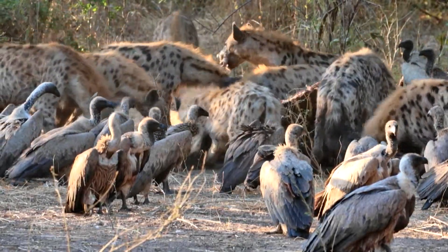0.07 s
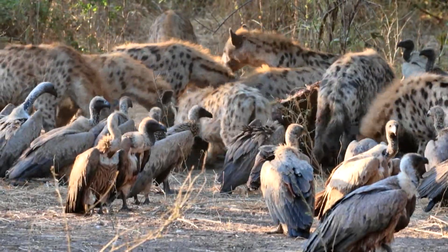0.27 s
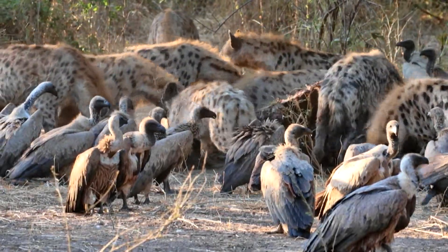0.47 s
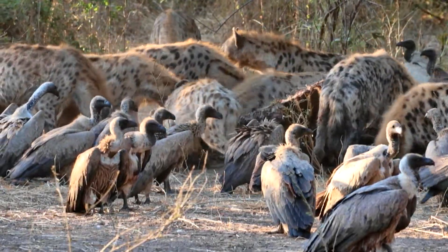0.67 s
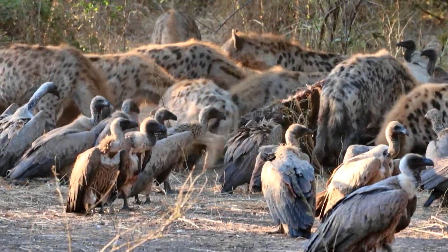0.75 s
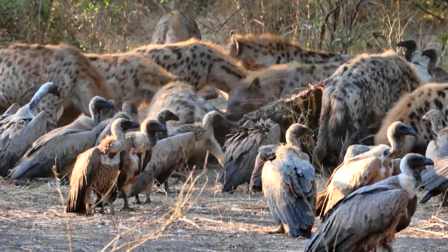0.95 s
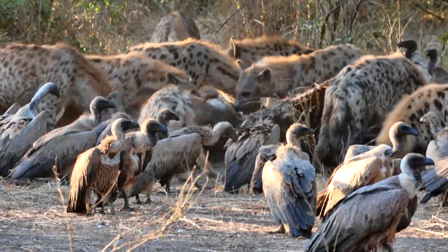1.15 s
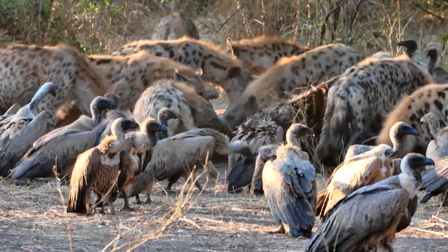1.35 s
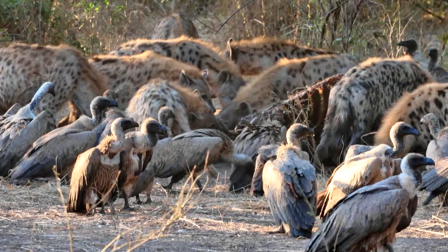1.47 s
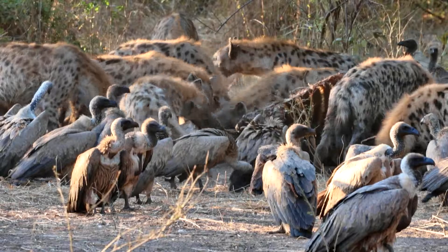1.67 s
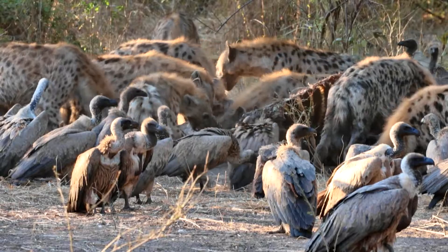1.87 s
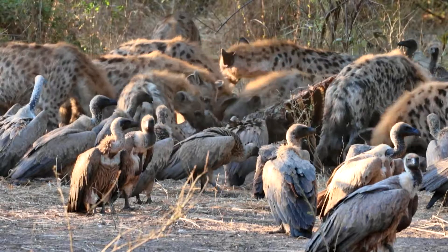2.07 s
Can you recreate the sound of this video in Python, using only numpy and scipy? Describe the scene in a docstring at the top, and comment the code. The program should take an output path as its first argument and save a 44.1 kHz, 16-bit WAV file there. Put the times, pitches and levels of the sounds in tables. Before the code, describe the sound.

A hyena's long whooping whine climbs hoarsely, cracks into a clear squeal, then sinks away outdoors

```python
"""Insects sing over still air and dry grass rustles; then, in open bush, hyenas squabble over a carcass.
One long call climbs as a hoarse moan with half-pitch lines, breaks up to a clear squeal and sinks again.
The scrub echoes it, a growl lies beneath, a small bird chirps twice, something among the vultures hisses.
Voice, bird and insects are sine waves with moving pitch; growl, hiss, grass and air are coloured noise."""
import sys
import numpy as np
from scipy import signal
from scipy.fft import rfft, irfft
from scipy.io import wavfile
from scipy.ndimage import uniform_filter1d

SR = 44100
rng = np.random.default_rng(int(sys.argv[2]) if len(sys.argv) > 2 else 0)


def bounce(signal):
    """Save signal as a 16-bit WAV file at the path given by the first command-line argument."""
    frames = np.transpose(np.atleast_2d(signal))
    limited = np.clip(frames, -1, 1)
    pcm = np.round(limited * 32767).astype(np.int16)
    wavfile.write(sys.argv[1], SR, pcm)


N = 92610
T = np.arange(N) / SR  # time of each sample, s

# colour of the still air: (f/Hz, level/dB)
AIR_COLOUR = [(22, -12), (42, 6.5), (1200, 8), (2200, -1), (5000, -4), (8500, -6.5), (16000, -17)]
AIR_DB = -54

# insect whines: (f/Hz, level/dB, slow wander/Hz)
INSECT_WHINES = [(9063, -60.5, 52), (7220, -69, 20)]
INSECT_WANDER_PER_S, INSECT_TREMOR_HZ, INSECT_FLUTTER_DB = 5, 45.5, 2

# strength of the low growl beneath the call: (t/s, level/dB)
GROWL_STRENGTH = [(0, -71), (.6, -67.5), (.8, -60.5), (1.12, -55.5), (1.3, -61.5), (1.8, -68.5)]
# colour of the growl: (f/Hz, level/dB)
GROWL_COLOUR = [(45, -28.5), (80, -2.5), (105, 2.5), (150, 0.5), (300, -28.5)]

# rustles in dry grass: (t/s, decay/s, centre f/Hz, level/dB)
GRASS_RUSTLES = [(0.032, 0.071, 4430, -56.5), (1.044, 0.03, 2620, -55.5), (1.051, 0.019, 6020, -53.5),
                 (1.229, 0.0081, 2850, -54), (1.6, 0.037, 4900, -55), (2.074, 0.0052, 4640, -44.5)]
RUSTLE_ATTACK_S, RUSTLE_GRAIN_DB = 0.0013, 5.5
RUSTLE_WIDTH = 1.44  # frequency ratio from the centre to where the noise is 4 dB weaker

# strength of the hiss: (t/s, level/dB)
HISS_STRENGTH = [(1.695, -67), (1.726, -45.5), (1.79, -46.5), (1.85, -56.5), (1.92, -66)]
# colour of the hiss: (f/Hz, level/dB)
HISS_COLOUR = [(3000, -31.5), (4700, -15), (6200, -10.5), (9200, -3), (10500, -17.5), (14500, -29)]

# bird chirps: (t/s, length/s, share spent rising, start f/Hz, top f/Hz, end f/Hz, level/dB before echo)
BIRD_CHIRPS = [(1.066, 0.087, 0.57, 5490, 6840, 6740, -44.5), (1.903, 0.066, 0.75, 5740, 6940, 6400, -43)]

# pitch of the long call: (t/s, f/Hz)
CALL_PITCH = [(0, 188.1), (.18, 231.9), (.28, 255.5), (.43, 282.5), (.53, 300.7), (.56, 306), (.595, 344.4),
              (.78, 360.2), (.98, 377.3), (1.04, 393.4), (1.10, 419), (1.13, 472.7), (1.17, 516.9),
              (1.25, 524.6), (1.31, 520.7), (1.34, 493.2), (1.38, 448), (1.43, 409.7), (1.52, 361.2),
              (1.68, 324), (1.83, 280.7), (1.93, 256.1), (2.1, 226.4)]
# strength of the call: (t/s, fundamental level/dB, overtone level/dB before throat and mouth)
CALL_STRENGTH = [(0, -81, -64), (.14, -49.5, -47), (.205, -40.5, -30.5), (.295, -41.5, -23.5),
                 (.335, -39, -26), (.375, -39, -28), (.41, -36.5, -28), (.455, -35.5, -29),
                 (.505, -33.5, -26), (.56, -25, -28.5), (.62, -20, -28), (.69, -23, -21),
                 (.84, -16.5, -22.5), (.93, -23, -23), (1.0, -16.5, -24.5), (1.085, -19.5, -25),
                 (1.12, -23.5, -17.5), (1.17, -21.5, -10.5), (1.205, -22.5, -10), (1.26, -18, -6.5),
                 (1.36, -21, -24.5), (1.46, -18, -29), (1.56, -22.5, -25), (1.69, -26.5, -21.5),
                 (1.83, -36, -19), (1.89, -42.5, -26.5), (1.95, -43, -25.5), (2.03, -47.5, -35),
                 (2.1, -78, -60)]
# half-pitch lines, gone once the voice has leapt: (t/s, level/dB before throat and mouth)
CALL_HALF_LINES = [(.03, -49.5), (.13, -49.5), (.205, -34), (.295, -25.5), (.335, -31.5), (.375, -25),
                   (.41, -34.5), (.455, -20.5), (.505, -28.5), (.56, -21.5), (.62, -28), (.69, -24.5),
                   (.84, -20), (.93, -17.5), (1.085, -13.5), (1.12, -15), (1.17, -41), (1.205, -74)]
# rough breath noise in the call: (t/s, level/dB)
CALL_RASP = [(.1, -57.5), (.5, -60), (.58, -39), (.68, -62), (1.03, -60), (1.13, -32.5), (1.3, -38),
             (1.47, -46.5), (1.75, -56)]
# throat and mouth resonances: (f/Hz, level/dB)
THROAT_RESONANCES = [(130, -31.5), (220, -34), (290, -15.5), (350, 1.5), (410, 3), (450, -5.5), (500, -19),
                     (565, -9.5), (630, -13), (700, -7), (770, -4), (830, -10), (920, -21), (1000, -30),
                     (1100, -24.5), (1215, -15), (1300, -26), (1400, -37), (1620, -50.5), (1830, -34.5),
                     (2200, -58)]
# mouth opening, as the lift of the upper resonances: (t/s, level/dB)
MOUTH_OPENING = [(0.2, -2), (0.52, 2.5), (0.85, -1.5), (1.05, -1.5), (1.27, -4.0), (1.45, 13.5),
                 (1.68, -1.5), (1.85, -16.5)]
MOUTH_FROM_HZ, MOUTH_FULL_HZ = 703, 1020  # the lift starts at the first and is complete at the second
# rough tones beside the voice where it cracks: (middle t/s, length/s, f/Hz, level/dB)
CRACK_TONES = [(1.16, 0.11, 725, -27), (1.18, 0.068, 825, -36.5), (1.31, .09, 595, -27.5),
               (1.183, 0.32, 1225, -41.5)]
# colour of the husky edge: (f/Hz, level/dB)
HUSK_COLOUR = [(1450, -13), (1830, 0.5), (3150, -19.5), (3420, 1), (3750, -19)]
HUSK_DB = -59.5  # at full voice

# Jitter and waver are shares of the pitch.
JITTER, JITTER_PER_S, WAVER, WAVER_PER_S = 0.0034, 129, 0.0016, 15
RASP_JITTER = 0.71  # extra jitter per unit of rasp amplitude
SIDE_TONE_JITTER = 0.0245
SHIMMER_DB, OVERTONE_FLICKER_DB = 0.5, 3
HALF_FALL_DB = 2  # from the second half line up, each is this much weaker
RASP_LOW_HZ = 488

# T60 is the time an echo takes to fade by 60 dB.
BUSH_T60_S, BUSH_DB, BUSH_BUILD_S, BUSH_TREBLE_T60_S = 0.5, -8.5, 0.037, 0.26
# a late echo off a distant line of trees
FAR_ECHO_S, FAR_ECHO_DB, FAR_ECHO_LOW_HZ, FAR_ECHO_HIGH_HZ = 0.3, -17.5, 452, 744
CUTOFF_HZ = 15800


def from_db(db):
    """Turn decibels into a gain."""
    return 10 ** (np.asarray(db) / 20)


def rms_one(x):
    """Scale to unit power."""
    return x / np.sqrt(np.mean(x ** 2) + 1e-20)


def in_time(rows):
    """Read each column of a table at every sample, with rounded corners."""
    times, *columns = np.transpose(rows)
    return [uniform_filter1d(np.interp(T, times, column), size=600) for column in columns]


def at_hz(points, hz):
    """Read a spectrum table in dB, along a logarithmic frequency scale."""
    f, db = np.transpose(points)
    return np.interp(np.log(hz + 1e-9), np.log(f), db)


def drift(rate):
    """Smooth random motion of spread 1; a higher rate moves faster."""
    step = 20  # made at every 20th sample, then joined by straight lines
    r = np.exp(-2 * np.pi * rate * step / SR)
    kicks = rng.standard_normal(N // step + 2002)
    slow = signal.lfilter([1], [1, -2 * r, r * r], kicks)[2000:]  # skip the filter's start
    return np.interp(np.arange(N) / step, np.arange(len(slow)), rms_one(slow))


def colour(x, spectrum):
    """Weight each frequency of a sound by a spectrum table."""
    hz = np.arange(N // 2 + 1) * SR / N
    return irfft(rfft(x) * from_db(at_hz(spectrum, hz)), N)


def noise(spectrum):
    """Coloured noise of unit power."""
    return rms_one(colour(rng.standard_normal(N), spectrum))


def sine(hz):
    """A sine wave that follows a moving pitch."""
    return np.sin(2 * np.pi * np.cumsum(hz) / SR)


def still_air():
    """Steady coloured noise for the open air."""
    return from_db(AIR_DB) * noise(AIR_COLOUR)


def insects():
    """Thin, steady whines whose pitch wanders and trembles a little."""
    out = np.zeros(N)
    for hz, db, wander_hz in INSECT_WHINES:
        pitch = hz + wander_hz * drift(INSECT_WANDER_PER_S) + INSECT_TREMOR_HZ * drift(200)
        out += from_db(db + INSECT_FLUTTER_DB * drift(60)) * sine(pitch)
    return out


def growl():
    """A faint low rumble from the feeding pack, made of low noise."""
    db, = in_time(GROWL_STRENGTH)
    return from_db(db) * noise(GROWL_COLOUR)


def rustles():
    """Trodden grass crunches: short noise bursts with a grainy level and a fading tail."""
    out = np.zeros(N)
    w = RUSTLE_WIDTH
    for start, decay, hz, db in GRASS_RUSTLES:
        age = np.maximum(T - start, 0)
        burst = (1 - np.exp(-age / RUSTLE_ATTACK_S)) * np.exp(-age / decay)
        grass = noise([(hz / w ** 4, -30), (hz / w, -4), (hz, 0), (hz * w, -4), (hz * w ** 4, -30)])
        out += from_db(db + RUSTLE_GRAIN_DB * drift(220)) * grass * burst
    return out


def hiss():
    """A short, bright hiss: noise with a fluttering level."""
    db, = in_time(HISS_STRENGTH)
    return from_db(db + 1.1 * drift(90)) * noise(HISS_COLOUR)


def bird():
    """Thin whistles that sweep up, level off and droop."""
    out = np.zeros(N)
    for start, length, turn, start_hz, top_hz, end_hz, db in BIRD_CHIRPS:
        u = np.clip((T - start) / length, 0, 1)  # progress through the chirp
        rising = top_hz + (start_hz - top_hz) * (1 - u / turn) ** 2
        drooping = top_hz + (end_hz - top_hz) * (u - turn) / (1 - turn)
        hz = np.where(u < turn, rising, drooping)
        out += from_db(db) * np.sin(np.pi * u) ** 2 * sine(hz + 40 * drift(430))
    return out


def bush(x, t60, db):
    """Add scattered echoes from scrub and trunks, which build up and die away."""
    echoes = rng.standard_normal(N) * (1 - np.exp(-T / BUSH_BUILD_S)) * from_db(-60 * T / t60)
    return x + from_db(db) * signal.fftconvolve(x, rms_one(echoes) / np.sqrt(N))[:N]


def far_echo(call):
    """A distant line of trees returns the middle of the call, late and thin."""
    band = [FAR_ECHO_LOW_HZ, FAR_ECHO_HIGH_HZ]
    thinned = signal.sosfilt(signal.butter(2, band, "band", fs=SR, output="sos"), call)
    return from_db(FAR_ECHO_DB) * np.interp(T - FAR_ECHO_S, T, thinned, left=0)


def husk(tone):
    """A faint, husky edge of noise that swells with the voice."""
    loudness = np.sqrt(np.abs(uniform_filter1d(tone ** 2, size=2000)))
    return from_db(HUSK_DB) * np.sqrt(loudness / loudness.max()) * noise(HUSK_COLOUR)


def side_tones():
    """Brief unsteady tones, out of step with the main pitch, where the voice cracks."""
    out = np.zeros(N)
    for middle, length, hz, db in CRACK_TONES:
        swell = np.cos(np.pi * np.clip((T - middle) / length, -.5, .5))
        out += from_db(db) * swell * sine(hz * (1 + SIDE_TONE_JITTER * drift(JITTER_PER_S)))
    return out


def rasp(phase, rasp_db):
    """Each cycle of the vocal folds puffs out breath noise, shaped by the throat."""
    puffs = rng.standard_normal(N) * (1 + np.cos(phase))
    shaped = colour(puffs, THROAT_RESONANCES)
    no_lows = signal.sosfilt(signal.butter(4, RASP_LOW_HZ, "high", fs=SR, output="sos"), shaped)
    return from_db(rasp_db) * rms_one(no_lows)


def voice(pitch, fundamental_db, overtone_db, half_db, jitter):
    """Jittery vocal folds; overtones and half lines from alternating cycles sweep through the throat."""
    mouth_db, = in_time(MOUTH_OPENING)
    hz = pitch * (1 + jitter * drift(JITTER_PER_S) + WAVER * drift(WAVER_PER_S))
    phase = 2 * np.pi * np.cumsum(hz) / SR
    out = from_db(fundamental_db + SHIMMER_DB * drift(11)) * np.sin(phase)

    overtones = [(k, overtone_db) for k in np.arange(2, 7)]
    half_lines = [(k, half_db - HALF_FALL_DB * max(k - 1.5, 0)) for k in np.arange(6) + .5]
    for k, strength_db in overtones + half_lines:
        line_hz = k * pitch
        upper = np.interp(line_hz, [MOUTH_FROM_HZ, MOUTH_FULL_HZ], [0, 1])
        flicker_db = (SHIMMER_DB + upper * OVERTONE_FLICKER_DB) * drift(36)
        resonance_db = at_hz(THROAT_RESONANCES, line_hz) + upper * mouth_db
        gain = from_db(strength_db + resonance_db + flicker_db)
        out = out + gain * np.sin(k * phase + rng.uniform(0, 2 * np.pi))
    return out, phase


def long_call():
    """The rising and falling whine; where it strains, the cycles grow uneven and puff out rasp."""
    pitch, = in_time(CALL_PITCH)
    fundamental_db, overtone_db = in_time(CALL_STRENGTH)
    half_db, = in_time(CALL_HALF_LINES)
    rasp_db, = in_time(CALL_RASP)
    jitter = JITTER + RASP_JITTER * from_db(rasp_db)
    tone, phase = voice(pitch, fundamental_db, overtone_db, half_db, jitter)
    return tone + rasp(phase, rasp_db) + side_tones() + husk(tone)


def scene():
    """The hyena call and small sounds in the bush, over insects and still air."""
    background = still_air() + insects() + growl()
    small_sounds = rustles() + hiss() + bush(bird(), BUSH_TREBLE_T60_S, db=-7.5)
    call = bush(long_call(), BUSH_T60_S, db=BUSH_DB)
    return (background + small_sounds + call + far_echo(call))[None]


def record(dry):
    """Cut the top steeply with a low-pass filter."""
    return signal.sosfilt(signal.ellip(12, .1, 80, CUTOFF_HZ, fs=SR, output="sos"), dry)


dry = scene()
out = record(dry)
bounce(out)
```